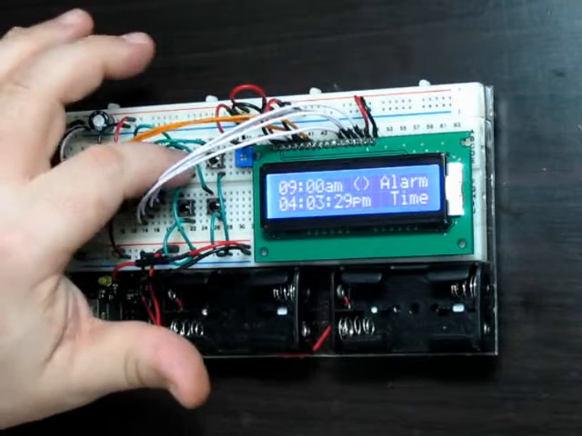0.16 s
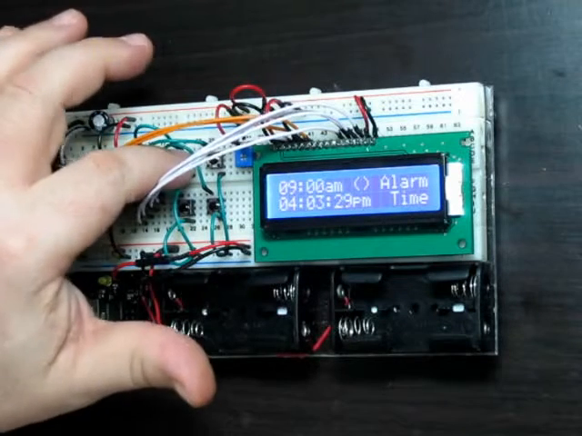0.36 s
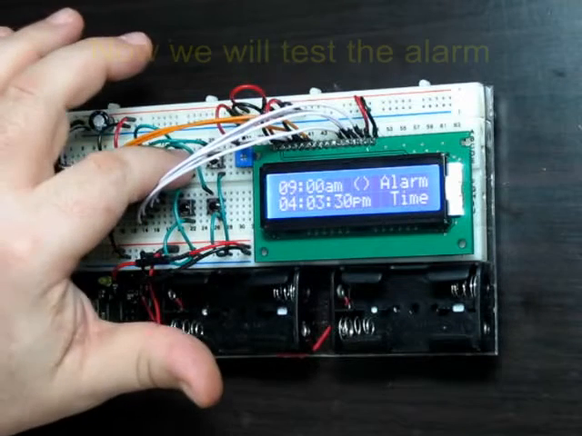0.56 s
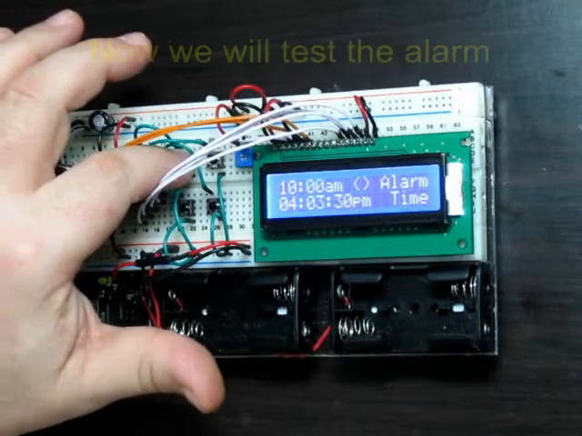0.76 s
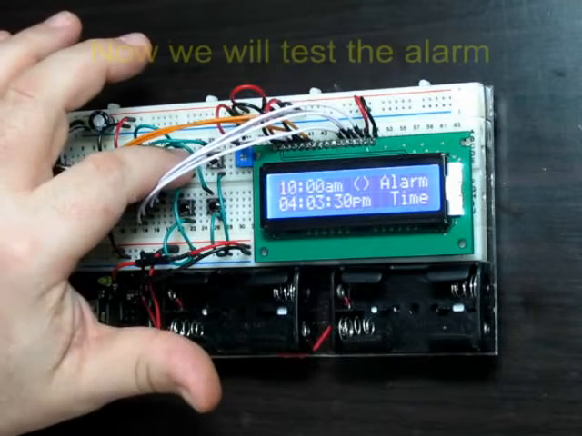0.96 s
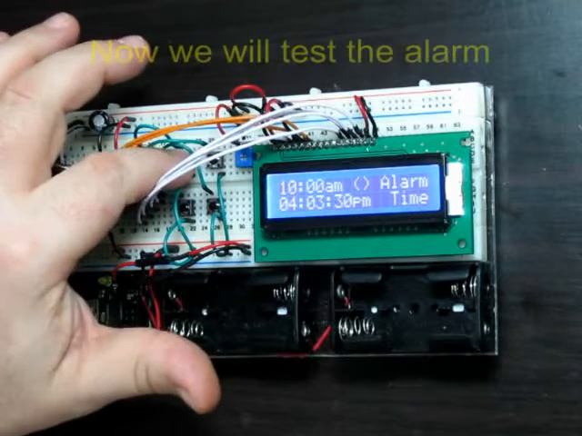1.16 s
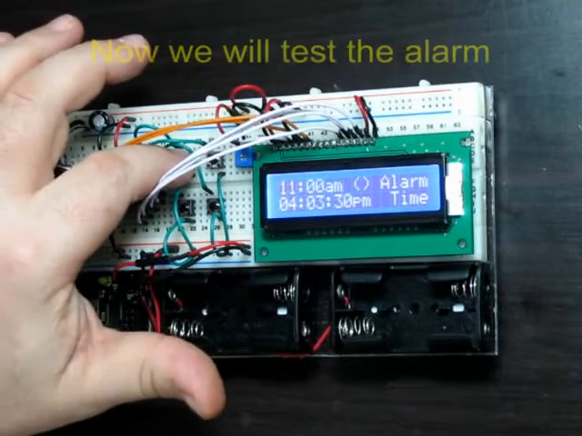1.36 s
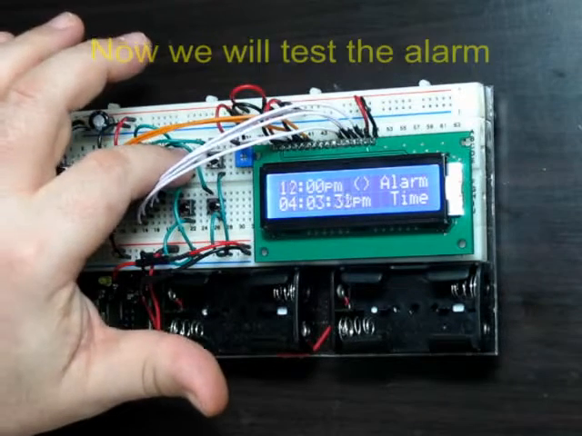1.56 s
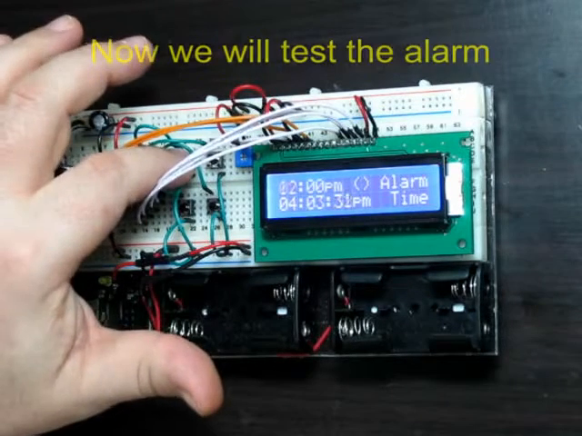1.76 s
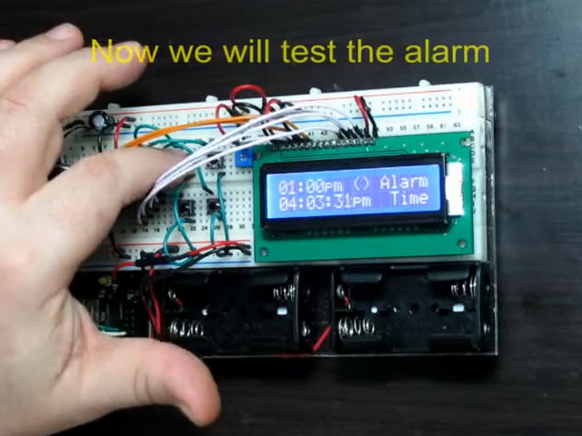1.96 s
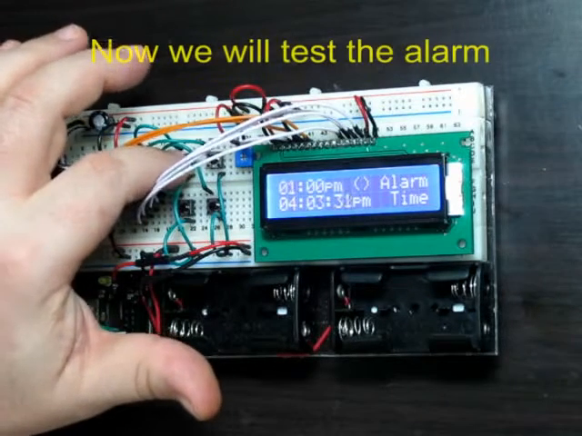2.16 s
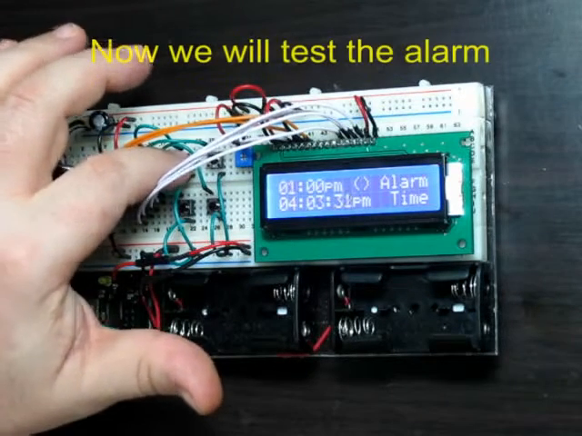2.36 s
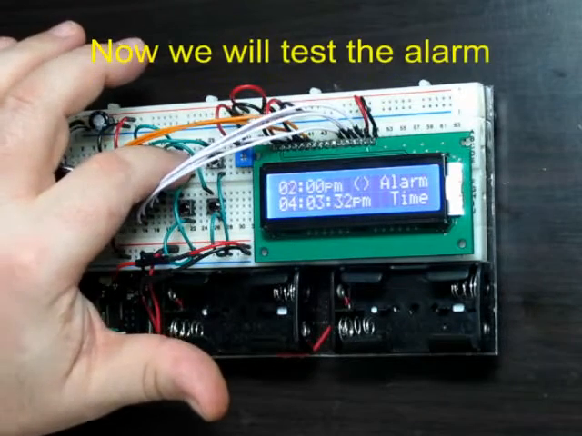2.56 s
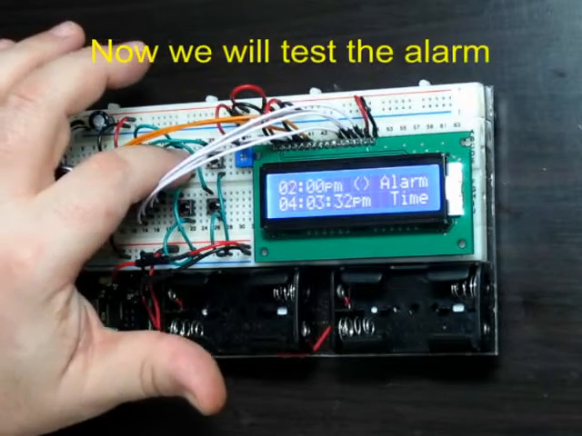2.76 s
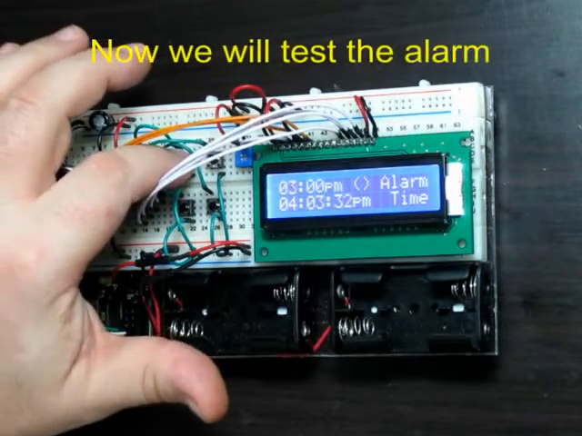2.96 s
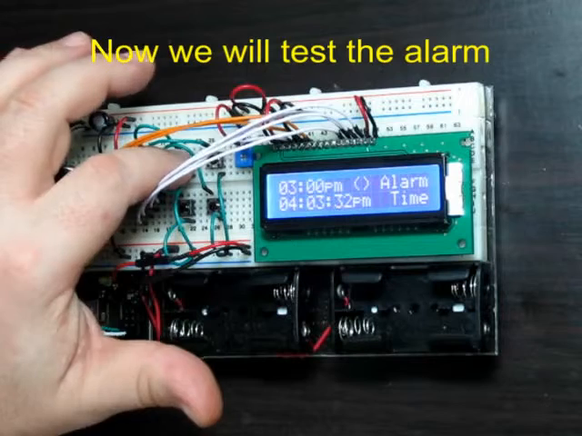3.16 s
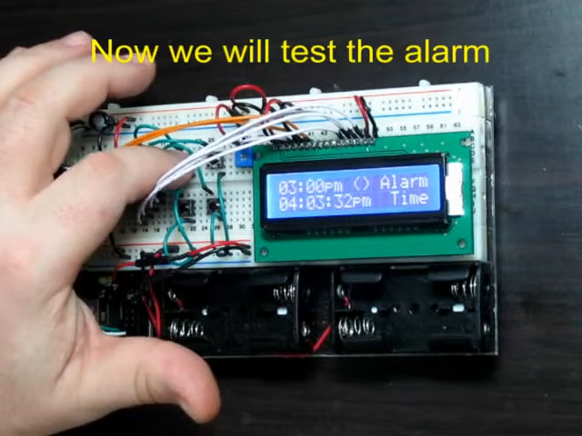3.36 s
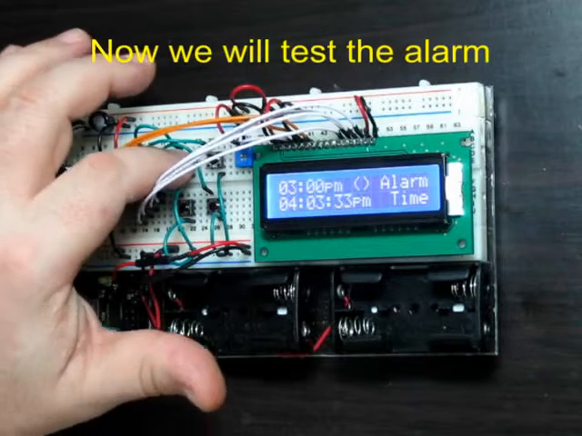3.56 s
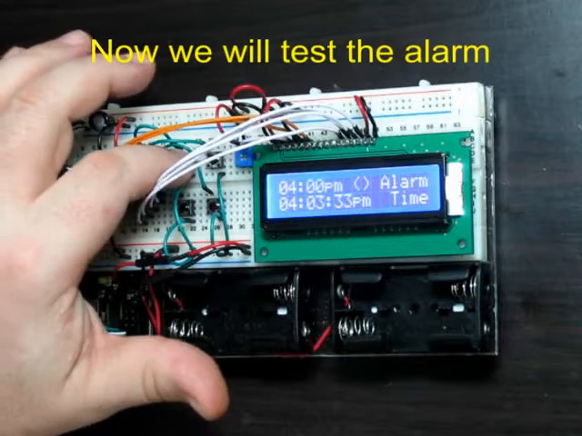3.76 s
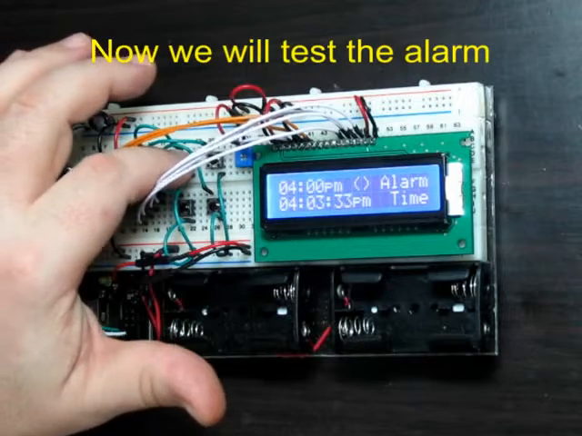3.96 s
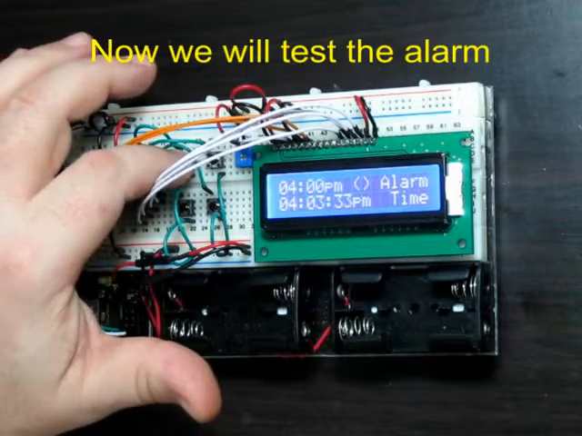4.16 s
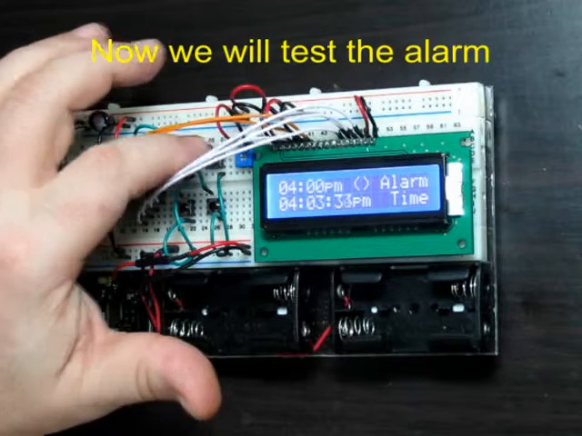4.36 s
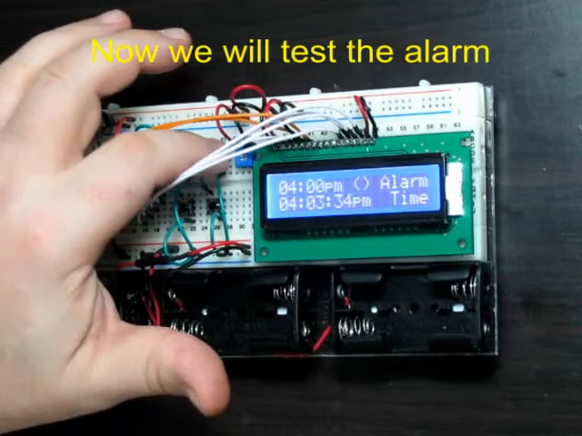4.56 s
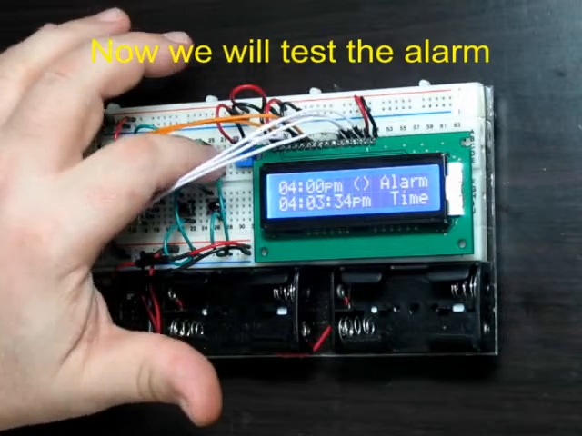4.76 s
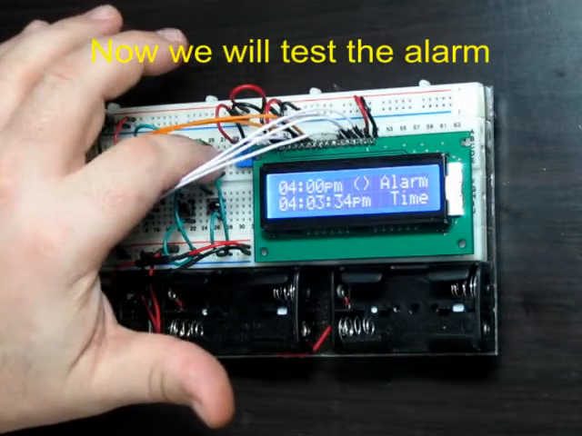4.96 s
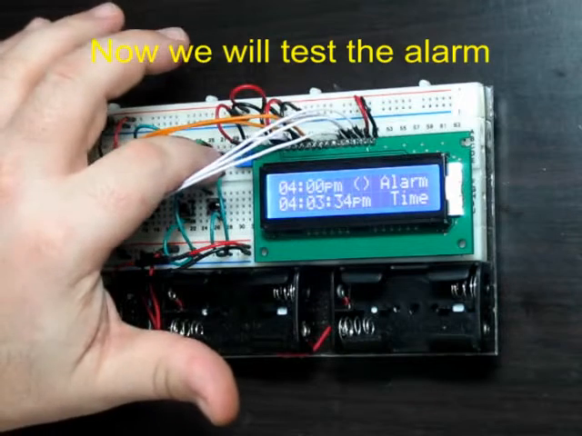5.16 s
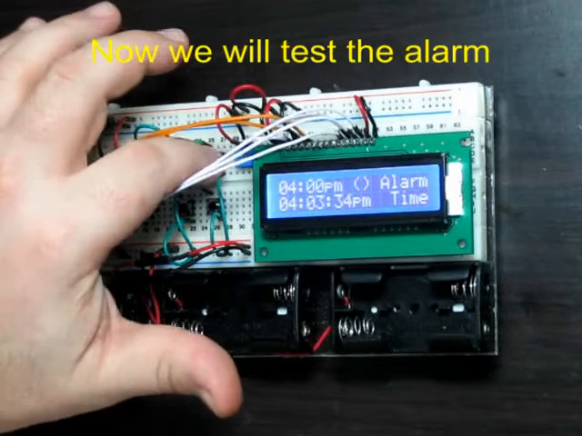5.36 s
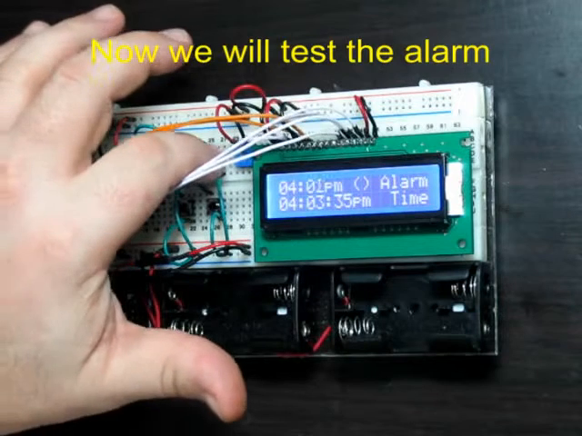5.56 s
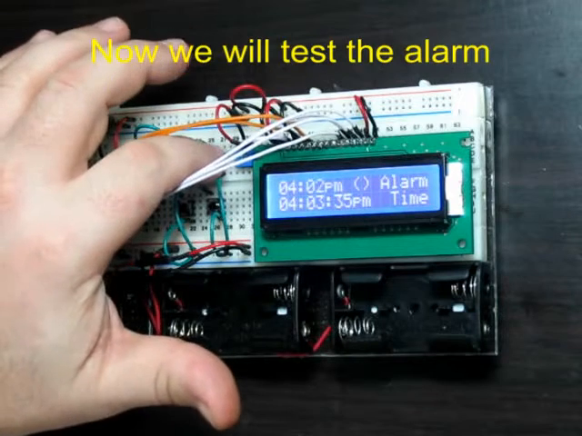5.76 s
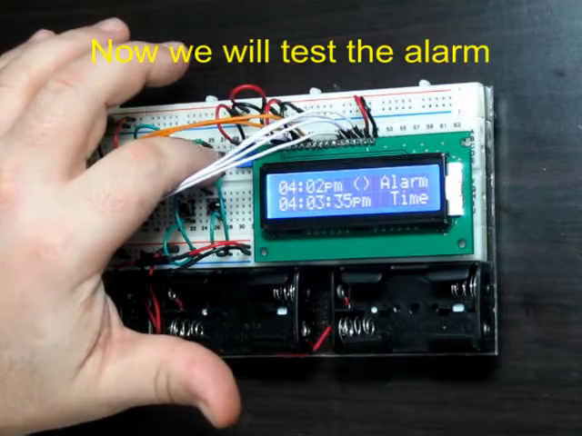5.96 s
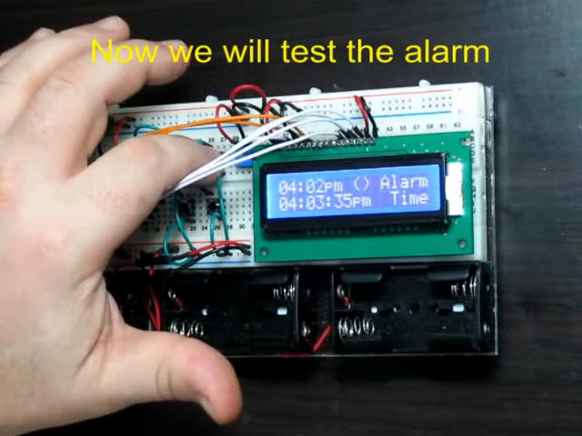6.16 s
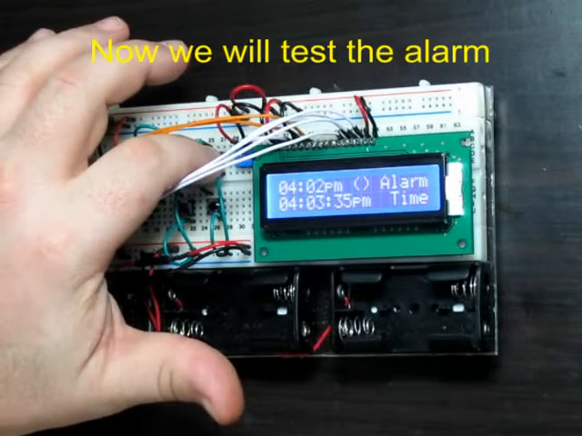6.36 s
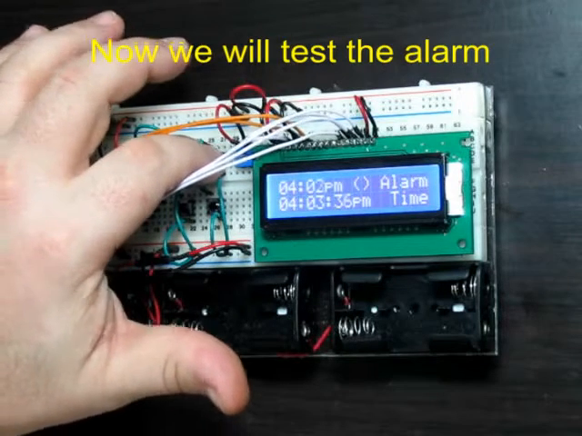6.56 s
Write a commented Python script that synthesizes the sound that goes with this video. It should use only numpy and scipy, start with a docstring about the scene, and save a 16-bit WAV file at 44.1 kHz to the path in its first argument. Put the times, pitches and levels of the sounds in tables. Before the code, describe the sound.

A finger presses little buttons on an electronics board nine times, each tick carrying a low knock, while a fan and hiss run behind.

```python
"""A fan rushes steadily indoors, over microphone hiss and a faint hum. From 0.5 s a finger works a small
pushbutton on a circuit board lying on a table, seven presses in an uneven rhythm. Each press and release
snaps a metal dome (a tick) and jolts the board (a low thump that the room repeats). The hum swells around
2.6 s and sinks back. Near 4.9 s the finger moves over with one soft brush, then presses a second button
twice, on a more hollow part of the board."""
import sys
import numpy as np
from scipy import signal
from scipy.fft import rfft, irfft
from scipy.io import wavfile

SR = 44100
rng = np.random.default_rng(int(sys.argv[2]) if len(sys.argv) > 2 else 0)


def file_out(sig):
    """Save sig as 16-bit WAV at sys.argv[1]."""
    # one column per channel
    cols = np.atleast_2d(sig).T
    # limit, then scale
    lim = np.clip(cols, -1, 1)
    pcm = np.round(lim * 32767).astype(np.int16)
    wavfile.write(sys.argv[1], SR, pcm)


N = 291942
TIME = np.arange(N) / SR
FREQ = np.fft.rfftfreq(N, 1 / SR)
MOVE_S = 4.87  # the finger crosses to the second button


def undb(db):
    """Decibels to gain."""
    return 10 ** (np.asarray(db) / 20)


def unit(x):
    """Scale to an energy of one."""
    return x / np.sqrt(np.sum(x ** 2))


def resonance(hz, width_hz):
    """Frequency response of a damped resonator, gain 1 at its centre."""
    return 1j * FREQ * width_hz / (hz ** 2 - FREQ ** 2 + 1j * FREQ * width_hz)


def eq_curve(points):
    """Frequency response through (freq_hz, level_db) points."""
    hz, db = np.transpose(points)
    return undb(np.interp(np.log(FREQ + 1), np.log(hz), db))


def noise(response):
    """Coloured noise with an rms of one."""
    return np.sqrt(N) * unit(irfft(rfft(rng.standard_normal(N)) * response, N))


def decay(t60_s):
    """Exponential decay from time zero."""
    return np.exp(-np.minimum(np.log(1000) * TIME / t60_s, 20))


def ring(modes):
    """Struck modes: sines with a quick attack, each dying at its own rate."""
    return sum(undb(db) * unit(np.cos(2 * np.pi * hz * TIME) * decay(t60_s) * (1 - decay(3 / hz)))
               for hz, t60_s, db in modes)


def snap(bands):
    """A short burst that builds in broad resonances and dies almost as fast."""
    return unit(sum(undb(db) * unit(irfft(resonance(hz, width) ** 2, N)) for hz, width, db in bands))


def convolve(x, response):
    """Play a signal through an impulse response of up to a second."""
    return signal.fftconvolve(x, response[:SR])[:N]


def hits(times_s, level_db):
    """One impulse for each hit."""
    out = np.zeros(N)
    np.add.at(out, np.clip(np.round(times_s * SR).astype(int), 0, N - 1), undb(level_db))
    return out


# EQ of the fan's rush and the microphone hiss: freq_hz, relative_db
AIR_EQ = [(25, -15), (45, -10.5), (95, -5.5), (140, 0.5), (195, -3.5), (260, -0.5), (650, -1), (1000, -5),
          (1300, -12), (2500, -20.5), (4500, -25.5), (7000, -29.5), (8500, -34), (9900, -38)]
# resonances that the fan's air rings: pitch_hz, width_hz, rms_db
FAN_RESONANCES = [(335.7, 47, -48), (766.6, 66, -49), (954, 69, -52)]


def fan_and_hiss():
    """The bed: moving air rushes and rings a few resonances, with microphone hiss on top."""
    air = undb(-39) * noise(eq_curve(AIR_EQ))
    return air + sum(undb(db) * noise(resonance(hz, width) ** 2) for hz, width, db in FAN_RESONANCES)


def hum(pitch_hz=90.2, rms_db=-59, swell_db=9, peak_s=2.6, width_s=1.05):
    """A faint low tone that wavers in pitch, swells once and sinks back."""
    waver = 1.4 * noise(resonance(0.69, 2.5) ** 2)
    lift_db = swell_db * np.exp(-((TIME - peak_s) / width_s) ** 2)
    return undb(rms_db + lift_db) * np.sqrt(2) * np.sin(2 * np.pi * pitch_hz * TIME + waver)


def finger_brush(peak_rms_db=-49.5, rise_db_per_s=110, fall_db_per_s=103):
    """Skin slides lightly over the wires: a short, soft swell of hiss."""
    below_peak_db = np.maximum(rise_db_per_s * (MOVE_S - TIME), fall_db_per_s * (TIME - MOVE_S))
    friction = noise(eq_curve([(500, -15), (1500, 4), (3500, -4), (6000, -12), (9000, -21.5)]))
    return undb(peak_rms_db - below_peak_db) * friction


def room_reverb(x, early_db=-16, early_t60_s=0.052, tail_db=-8.5, tail_t60_s=0.21):
    """Scattered reflections from near surfaces, then a faint tail."""
    attack = 1 - np.exp(-TIME / 0.0015)
    early = unit(rng.standard_normal(N) * attack * decay(early_t60_s))
    tail = unit(rng.standard_normal(N) * attack * decay(tail_t60_s))
    return x + convolve(x, undb(early_db) * early + undb(tail_db) * tail)


# reflections off surfaces close to the board: delay_s, gain
NEAR_ECHOES = [(.003, .9), (.007, .7), (.0157, .85), (.024, .6)]


def flutter_echo(round_trip_s=0.0392):
    """Frequency response of the near echoes; the far wall repeats their low mids, weaker each trip."""
    delay = lambda seconds: np.exp(-2j * np.pi * FREQ * seconds)
    near = 1 + sum(gain * delay(delay_s) for delay_s, gain in NEAR_ECHOES)
    wall = undb(-6) * resonance(hz=225, width_hz=250)
    return near / (1 - wall * delay(round_trip_s))


# the board's hollow knock above its thump: pitch_hz, width_hz, relative_db
KNOCK_BANDS = [(282.3, 63, 0.5), (454, 117, -12)]
# lingering modes of table and room: pitch_hz, t60_s, relative_db
BOOM_MODES = [(86.6, 0.93, -17), (123.6, 1, -12.5), (249.3, 0.24, -12.5), (311.7, 0.32, -7),
              (338.4, 0.3, -12), (369, 0.19, -18.5), (446.6, 0.57, -15.5), (530, 0.36, -22)]


def board_thumps(strokes, lag_s, pitch_hz, width_hz, thump_db, knock_db, boom_db,
                 second_thump_db, second_knock_db):
    """The jump in force, alike on each stroke of a button, jolts the board; the room draws it out."""
    times_s = np.transpose(strokes)[0] + lag_s
    on_second = times_s > MOVE_S  # the second button gets more thump and more knock
    echoes = flutter_echo()
    jolt = lambda hz, width: unit(irfft(resonance(hz, width) ** 2 * echoes, N))
    hollow = sum(undb(db) * jolt(hz, width) for hz, width, db in KNOCK_BANDS)
    thump = convolve(hits(times_s, thump_db + on_second * second_thump_db), jolt(pitch_hz, width_hz))
    knock = convolve(hits(times_s, knock_db + on_second * second_knock_db), hollow)
    boom = convolve(hits(times_s, boom_db), ring(BOOM_MODES))
    return thump + knock + boom


# the board's ring-out after a snap: pitch_hz, t60_s, relative_db
BOARD_RING = [(559, 0.28, -20.5), (680, 0.028, -11), (790, 0.078, -8.5), (1003, 0.025, -8),
              (1526, 0.051, -14), (1980, 0.0087, -8)]
# the dome's own ping: pitch_hz, width_hz, relative_db
DOME_PING = [(2946, 490, -4.5), (3344, 840, 3.5)]
# the crack of the dome's stop: pitch_hz, width_hz, relative_db
STOP_CRACK = [(4590, 1070, 15), (5940, 1300, 8), (8050, 490, -18.5)]


def dome_ticks(strokes, body_bands, travel_s, give_db, body_db, board_db, ping_db, crack_db):
    """The dome gives way and rings switch and board, then hits its stop; both instants ping and crack."""
    start_s, level_db, brightness_db = np.transpose(strokes)
    stop_s = start_s + travel_s
    give_s = stop_s - 0.0007 * (1 + 0.035 * rng.standard_normal(len(start_s)))
    body = undb(body_db) * snap(body_bands) + undb(board_db) * ring(BOARD_RING)
    ticks = convolve(hits(give_s, level_db), body)
    # a brighter snap lifts the ping, and the crack about twice as much
    for bands, stop_db in ((DOME_PING, level_db + ping_db + brightness_db),
                           (STOP_CRACK, level_db + crack_db + 2.02 * brightness_db)):
        double_hit = hits(give_s, stop_db + give_db) + hits(stop_s, stop_db)
        ticks = ticks + convolve(double_hit, snap(bands))
    return ticks


# cues for the dome snapping in: start_s, level_db, brightness_db
PRESS_CUES = [(0.4687, -13, -0.5), (1.0498, -11.5, 1.5), (1.3013, -11, -2), (1.5907, -12.5, -1),
              (2.2311, -15.5, -1.5), (2.6452, -15, -0.5), (3.421, -11, -1), (5.2441, -14.5, -0.5),
              (6.3829, -17.5, -0.5)]
# cues for the dome springing back: start_s, level_db, brightness_db
RELEASE_CUES = [(0.6326, -15.5, 0), (1.1712, -14, 2), (1.4649, -11.5, 2.5), (1.7144, -16, 1),
                (2.3614, -18, -0.5), (2.7987, -18.5, -0.5), (3.5947, -14.5, -1.5), (5.4764, -13, -1),
                (6.4998, -15, 0)]
# the switch body's tone with the dome down: pitch_hz, width_hz, relative_db
PRESSED_BODY = [(1765, 230, -11), (2090, 470, -5.5)]
# its tone with the dome free again: pitch_hz, width_hz, relative_db
RELEASED_BODY = [(2080, 190, 0)]


def pushbuttons():
    """A tick layered on a thump; releases push the board the other way, so their polarity is flipped."""
    down = dome_ticks(PRESS_CUES, PRESSED_BODY, travel_s=0.0011, give_db=0.5,
                      body_db=-2.5, board_db=-2.5, ping_db=-5.5, crack_db=-11)
    up = dome_ticks(RELEASE_CUES, RELEASED_BODY, travel_s=0.0006, give_db=-12,
                    body_db=-2.5, board_db=4, ping_db=-2.5, crack_db=-10.5)
    push = board_thumps(PRESS_CUES, lag_s=0.00046, pitch_hz=176, width_hz=105, thump_db=0.1,
                        knock_db=-5.5, boom_db=-1.5, second_thump_db=3, second_knock_db=5.5)
    lift = board_thumps(RELEASE_CUES, lag_s=0.00043, pitch_hz=171.2, width_hz=82, thump_db=5.5,
                        knock_db=-5.5, boom_db=-2, second_thump_db=1.5, second_knock_db=3.5)
    return room_reverb(down - up) + push - lift


def scene():
    """The mono mix: buttons up front; fan, hiss, hum and brush behind."""
    return (pushbuttons() + fan_and_hiss() + hum() + finger_brush())[None]


def record(dry, top_hz=9900, dc_offset=-0.0117):
    """The microphone thins deep bass and high treble; the recorder cuts the top and sits off zero."""
    thin = signal.sosfilt(signal.butter(1, 30, "high", fs=SR, output="sos"), dry)
    soft = signal.sosfilt(signal.butter(8, 9200, fs=SR, output="sos"), thin)
    return signal.sosfilt(signal.ellip(12, 0.1, 80, top_hz, fs=SR, output="sos"), soft) + dc_offset


dry = scene()
out = record(dry)
file_out(out)
```